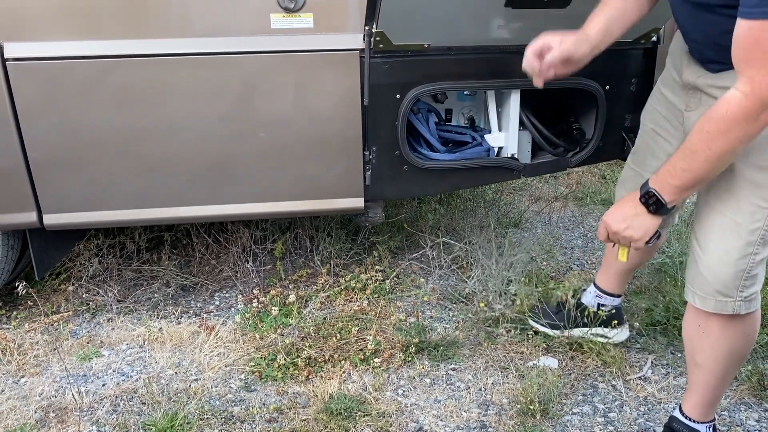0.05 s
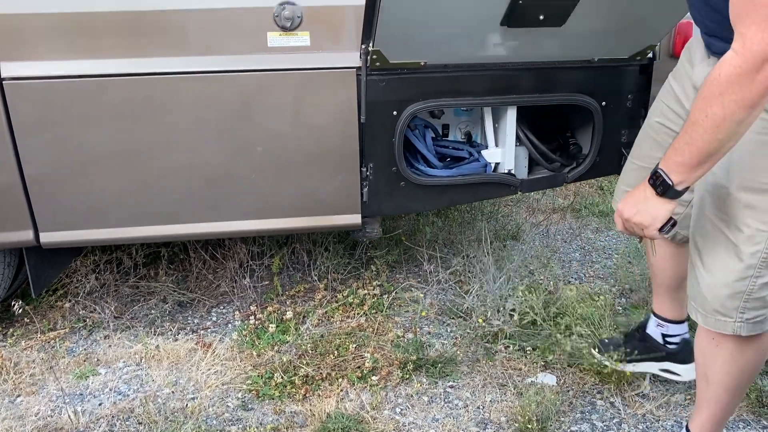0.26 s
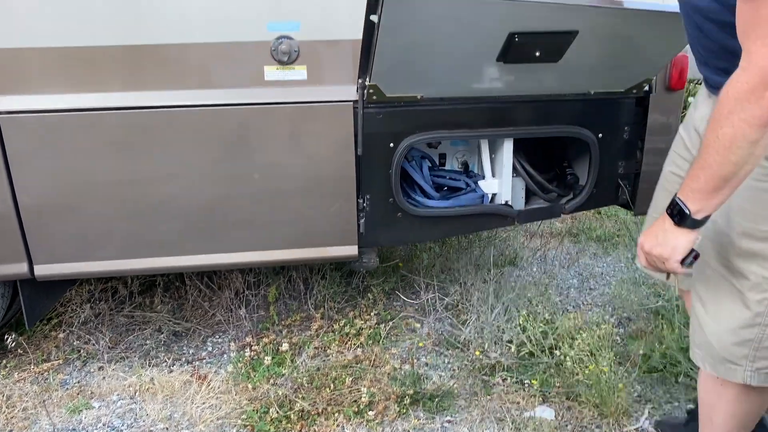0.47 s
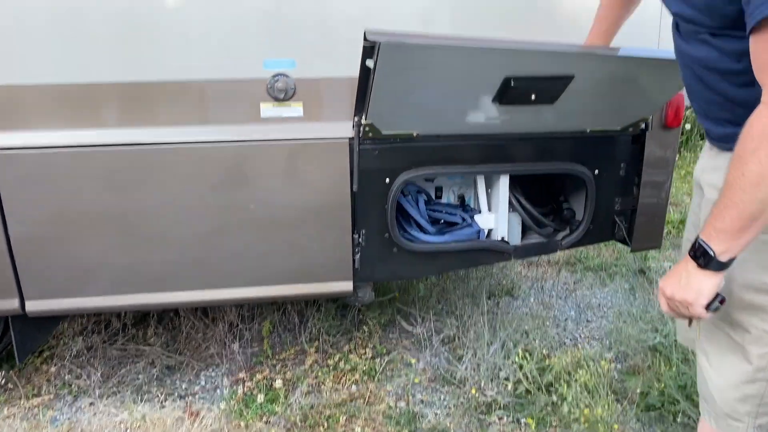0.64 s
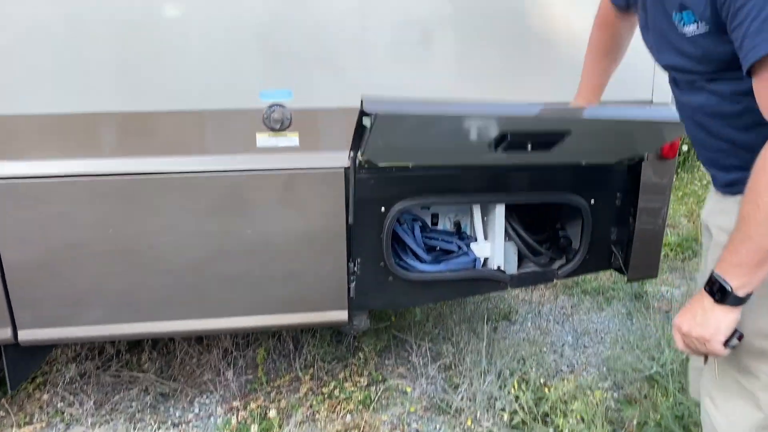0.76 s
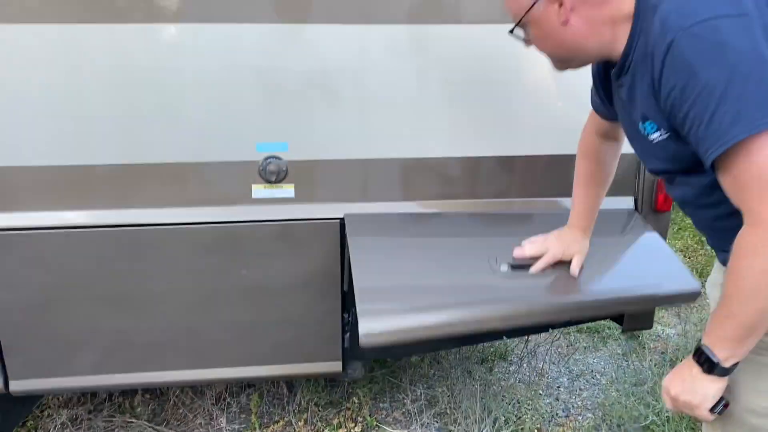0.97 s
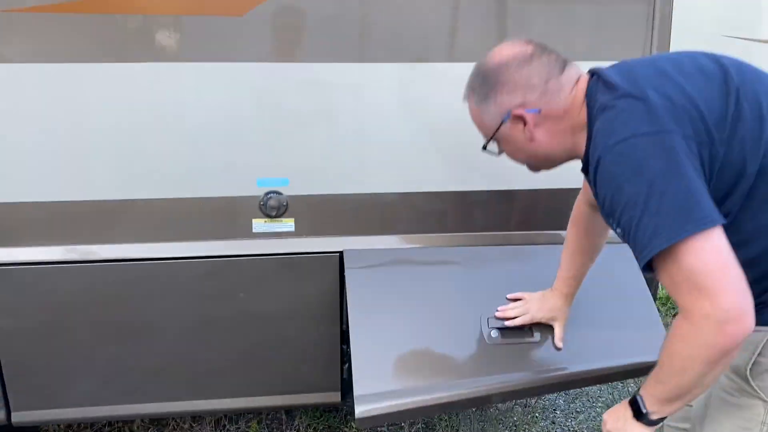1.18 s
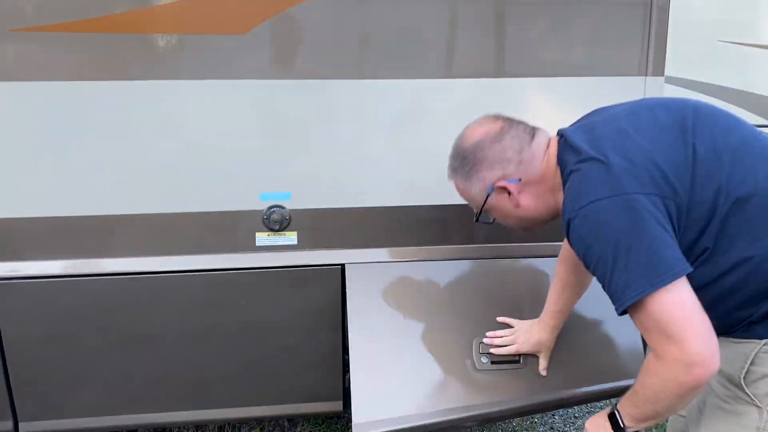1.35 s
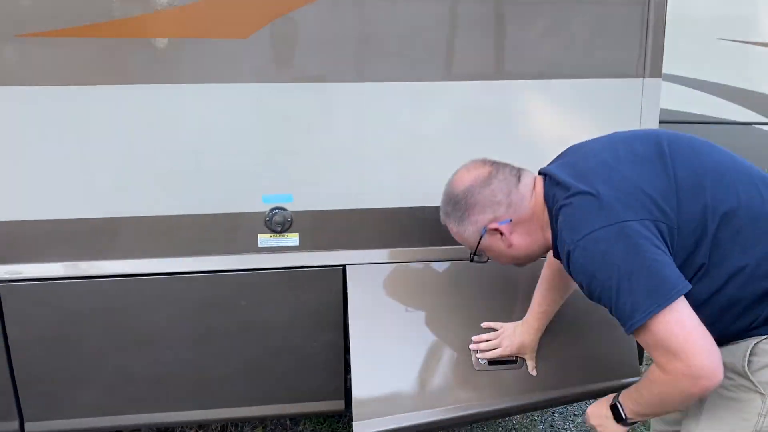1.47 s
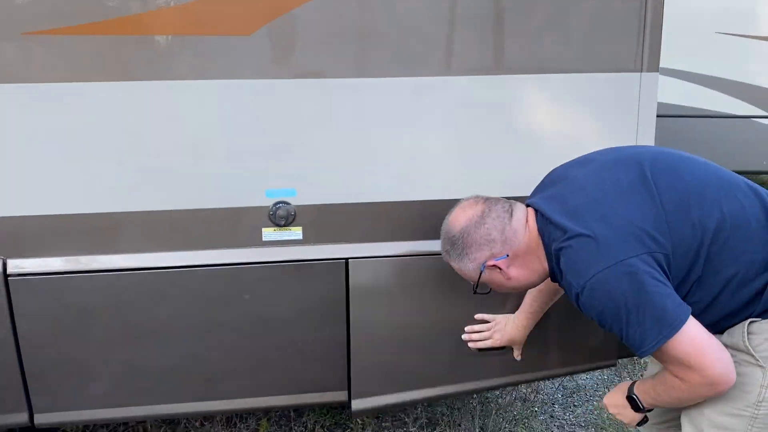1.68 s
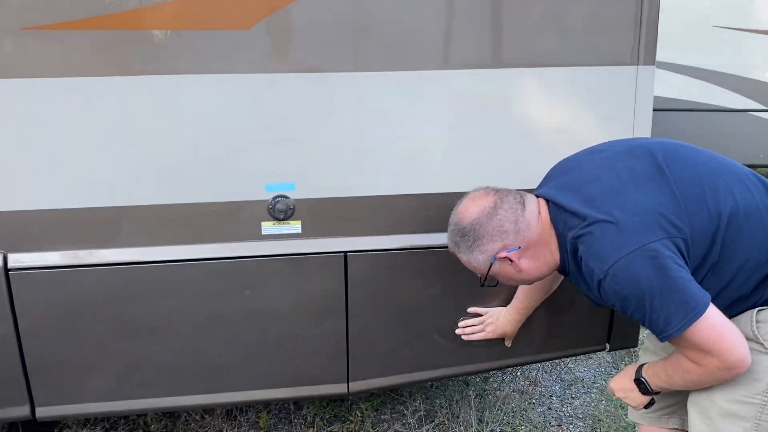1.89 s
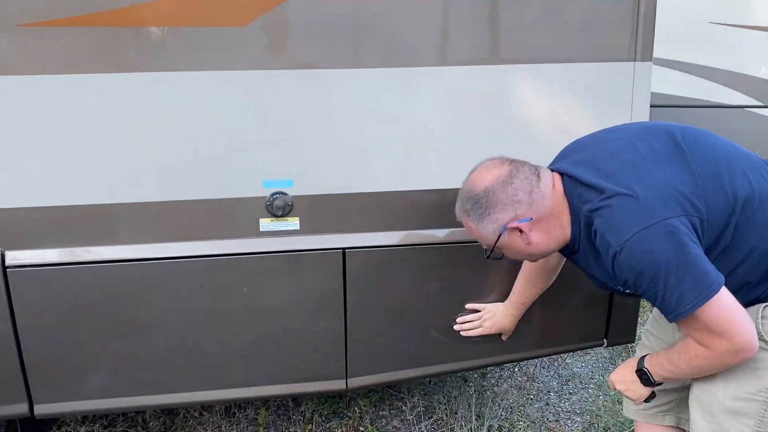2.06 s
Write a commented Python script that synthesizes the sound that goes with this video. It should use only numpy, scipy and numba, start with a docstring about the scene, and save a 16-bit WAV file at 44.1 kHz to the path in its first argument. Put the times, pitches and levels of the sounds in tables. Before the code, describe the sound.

Light clicks and knocks, then a metal compartment door bangs shut and rings briefly.

```python
"""A yard with gravel underfoot, about two metres from a motorhome whose metal side hatch is slammed.
Air rumbles, a distant machine hums and shoes scuff the stones. As the hatch swings down, light
impacts give knocks, ticks, taps and thuds. Then rim and latch strike the frame in quick succession:
each impulse sets the panel's modes in free, damped vibration, and the compartment booms at its
resonances. The yard returns a faint reverberant tail and one echo."""
import sys
import numpy as np
from scipy import signal
from scipy.fft import rfft, irfft, next_fast_len
from scipy.io import wavfile
from numba import njit

SR = 44100
rng = np.random.default_rng(int(sys.argv[2]) if len(sys.argv) > 2 else 0)


def generate_wav(sig):
    """Save sig (samples, or channels by samples) to the path in sys.argv[1] as 16-bit PCM at SR."""
    pcm = np.round(np.clip(np.atleast_2d(sig).T, -1, 1) * 32767).astype(np.int16)
    wavfile.write(sys.argv[1], SR, pcm)


N = 93580
T = np.arange(N) / SR
SEATING_S = 1.7435  # the hatch seats in its frame

# Spectrum of the outdoor air (f/Hz, level/dB)
AIR_SPECTRUM = [(20, -61), (40, 3.5), (58, -0.5), (120, -1), (170, -8), (350, -13.5), (700, -19.5),
                (1500, -25), (3000, -34), (6000, -40), (15000, -61)]
# Stereo width of the air, side relative to mid (f/Hz, level/dB)
AIR_WIDTH = [(60, -11), (110, -13), (200, -8.5), (380, -5), (700, 0), (1290, 3), (2380, -2.5), (4400, -3.5),
             (8120, 1), (15000, -5.5)]
# Partials of the distant machine (f/Hz, level/dB)
HUM_PARTIALS = [(76.4, -51), (100, -58.5)]
# Spectrum of the high hiss (f/Hz, level/dB)
HISS_SPECTRUM = [(5000, -1), (8000, -9.5), (10200, 4.5), (12000, -8.5), (13800, 8), (16000, -7.5)]
# Envelope of the hiss (t/s, relative level/dB)
HISS_ENVELOPE = [(0, -58.5), (.25, -57.5), (.45, -70), (1.2, -67.5), (1.4, -59.5), (1.62, -73.5),
                 (1.9, -74), (2.1, -93.5)]
# Spectrum of the yard's diffuse tail (f/Hz, level/dB)
TAIL_SPECTRUM = [(80, 15), (300, 0.5), (800, -8), (2000, -26), (5000, -30.5), (8000, -41.5), (15000, -60)]
# Frequency response of the echo path (f/Hz, level/dB)
ECHO_RESPONSE = [(100, -5), (800, -0.5), (2000, 1), (4800, 2.5), (9000, -5), (15000, -9)]
# Scuffs of the shoes (centre t/s, half length t/s, level/dB)
SHOE_SCUFFS = [(0.6, 0.022, -51), (0.736, 0.081, -53), (0.946, 0.088, -56), (1.301, 0.069, -58.5),
               (1.41, 0.032, -49), (1.493, 0.033, -55.5)]
# Spectrum of colliding stones (f/Hz, level/dB)
GRAVEL_SPECTRUM = [(200, 4), (800, 3), (2000, -4.5), (4300, -10.5), (8000, -21.5), (15000, -28.5)]
# Ticks of fittings and stones (t/s, level/dB, centre f/Hz)
TICK_IMPACTS = [(0.414, -52, 11000), (0.4877, -53.5, 6500), (0.713, -46, 7000), (.718, -52, 9500),
                (0.756, -49, 9000), (0.777, -50, 7000), (.857, -51.5, 5500), (1.068, -48.5, 9000),
                (1.292, -47, 3280), (1.336, -50.5, 3600), (1.358, -47, 13000), (1.362, -47, 3000),
                (1.493, -51.5, 4300), (1.648, -53.5, 4030), (1.6858, -42.5, 4430)]
# Thuds of the swinging hatch (t/s, level/dB, f/Hz)
FLEX_THUDS = [(0.671, -35, 319.4), (0.913, -38.5, 225), (.955, -70, 93)]
# Light taps on the sheet (t/s, level/dB)
SHEET_TAPS = [(0.4895, -37), (0.5586, -42.5)]
# Knocks of the hinge (t/s, level/dB, f/Hz)
HINGE_KNOCKS = [(0.593, -46, 954), (.609, -44, 834), (.6665, -32, 928), (.672, -34, 464.6),
                (.720, -46, 865), (.757, -42.5, 1003), (1.430, -49, 1157), (1.5405, -43, 723)]
# Spectrum of the hinge's rattle (f/Hz, level/dB)
RATTLE_SPECTRUM = [(150, 5), (320, 4), (650, -2.5), (1000, 0.5), (1900, -10), (4000, -28.5), (10000, -44)]
# Modes of the compartment and the vehicle's side (f/Hz, level/dB, T60/s)
COMPARTMENT_MODES = [(55.8, -9.5, 0.21), (59.9, -27.5, 2.2), (94.7, -15, 0.47), (113.8, -2.5, 0.15),
                     (142.7, -15, .3), (206.5, -16, 0.23), (470, -18, 0.12), (476, -38, 1.55)]
# Spectrum of the body's shudder around the frame (f/Hz, level/dB)
SHUDDER_SPECTRUM = [(25, -38.5), (45, -19), (65, -5.5), (130, -8.5), (220, -5), (330, -4), (450, -13),
                    (620, -5.5), (1000, -21), (4000, -50)]
# Contacts of the slam (t/s, panel level/dB, latch level/dB)
SLAM_CONTACTS = [(1.7293, -26.5, -49), (1.7335, -7.5, -28.5), (1.7378, -8.5, -13.5), (1.7406, -15, -10.5),
                 (1.7457, -8.5, -27.5), (1.7570, -20, -26), (1.7636, -18, -33.5), (1.7765, -19, -23.5)]
# Modes of the hatch panel (f/Hz, relative level/dB, T60/s)
HATCH_MODES = [(301.5, -6.5, 0.14), (338.3, -11, 0.18), (366, -9, 0.24), (507, -10, .13), (605.6, -2, .13),
               (677, -5.5, 0.12), (735, -3, 0.086), (785, 0, 0.053), (852, 2, 0.087), (990, -8, 0.095),
               (1290, -28, 0.097), (1427, -12, 0.116), (1656, -11.5, 0.078), (2720, -26, 0.069),
               (3806, -17.5, 0.11)]
# Spectrum of the metal skin's clatter (f/Hz, level/dB)
SKIN_SPECTRUM = [(120, -31.5), (300, -3.5), (500, -7.5), (800, 6.5), (1150, -6.5), (1550, -5.5),
                 (2400, -16), (5000, -17), (10000, -38)]
# Spectrum of the latch's crack (f/Hz, level/dB)
LATCH_SPECTRUM = [(800, -20), (2000, 1), (3500, 0), (5800, 2.5), (8000, -10.5), (10500, -6), (12000, -24),
                  (13700, 3), (16000, -33.5)]
# Stereo width of the hatch, side relative to mid (f/Hz, level/dB)
HATCH_WIDTH = [(60, -20), (250, -17), (600, -7), (2000, -6.5), (5000, -1.5), (9000, 0)]
# Balance of the near sources, left relative to right (f/Hz, level/dB)
NEAR_BALANCE = [(60, -0.5), (130, -2), (260, .5), (520, -1), (1000, -3), (4000, -3), (9000, -1.5)]


def undb(db):
    """Amplitude ratio of a level in decibels."""
    return 10 ** (np.asarray(db) / 20)


def colour(x, points):
    """Linear filtering: the spectrum is multiplied by a curve of (f/Hz, level/dB) points."""
    hz, db = np.array(points, float).T
    size = next_fast_len(N + 4096, real=True)
    f = np.maximum(np.fft.rfftfreq(size, 1 / SR), 1)
    response = undb(np.interp(np.log(f), np.log(hz), db))
    return irfft(rfft(x, size) * response, size)[..., :N]


def unit(x):
    """Normalisation to rms 1."""
    return x / np.std(x)


def noise(spectrum, width):
    """Partly coherent stereo noise of rms 1: the sum and difference of mid and side signals."""
    mid, side = rng.standard_normal((2, N))
    return unit(colour(mid + np.array([[1], [-1]]) * colour(side, width), spectrum))


def fade(start, t60, rise=0.00049):
    """Exponential damping: after a quick rise the level falls 60 dB in t60 seconds."""
    age = np.maximum(T - start, 0)
    return (1 - np.exp(-age / rise)) * np.exp(-np.log(1000) * age / t60)


def ring(start, hz, t60, rise=0.00021):
    """Free vibration of one struck mode: a damped sinusoid."""
    return fade(start, t60, rise) * np.sin(2 * np.pi * hz * (T - start))


def metal_noise(spectrum, spacing_hz, scatter_db):
    """High modal density: one noise per slam contact, all through the same uneven resonances."""
    noises = np.array([noise(spectrum, HATCH_WIDTH) for _ in SLAM_CONTACTS])
    hz = np.arange(1, SR / 2, spacing_hz)
    db = scatter_db * rng.standard_normal(N)[:len(hz)]
    return unit(colour(noises, np.column_stack([hz, db])))


def machine_hum():
    """Steady vibration of a distant machine radiates a line spectrum."""
    return sum(undb(db) * np.sqrt(2) * np.sin(2 * np.pi * (hz * T + rng.random()))
               for hz, db in HUM_PARTIALS)


def air():
    """Random pressure has a continuous spectrum: a low rumble, and a hiss that comes and goes."""
    hiss_db = np.interp(T, *np.array(HISS_ENVELOPE).T) - 2
    hiss = undb(hiss_db) * noise(HISS_SPECTRUM, AIR_WIDTH)
    return hiss + undb(-50) * noise(AIR_SPECTRUM, AIR_WIDTH)


def yard_reflections(bang):
    """Diffuse reflection gives a faint tail; scattering across the yard smears one late echo."""
    tail = undb(-25.5) * noise(TAIL_SPECTRUM, AIR_WIDTH) * fade(SEATING_S, t60=0.82, rise=0.014)
    echo_path = rng.standard_normal((2, N)) * fade(start=0.142, t60=0.31)
    echo_path /= np.sqrt(np.sum(echo_path ** 2, axis=1, keepdims=True))  # unit energy
    echo = signal.fftconvolve(colour(bang, ECHO_RESPONSE), echo_path, axes=1)[:, :N]
    return tail + undb(-36.5) * echo


def gravel(grains_per_s=6800, scatter_db=7, width=0.8):
    """Shot noise: stones collide at random under the shoes, swelling with each scuff."""
    impacts = (rng.random(N) < grains_per_s / SR) * undb(scatter_db * rng.uniform(-0.69, 1, N))
    grains = impacts * (rng.standard_normal(N) + width * rng.standard_normal((2, N)))
    swell = sum(undb(db) * np.exp(-((T - centre) / half) ** 2) for centre, half, db in SHOE_SCUFFS)
    return unit(colour(grains, GRAVEL_SPECTRUM)) * swell


def squeak(centre_s=1.574, half_s=0.022, centre_hz=5600, fall_hz_per_s=23000):
    """A linear chirp under a Gaussian envelope is heard as a faint, falling squeak."""
    offset = T - centre_s
    cycles = centre_hz * offset - fall_hz_per_s * offset ** 2 / 2
    return undb(-70.5) * np.exp(-(offset / half_s) ** 2) * np.sin(2 * np.pi * cycles)


def ticks(db_per_octave=6.5):
    """Brief impacts have broad spectra: fittings and stones tick, each with its own brightness."""
    out = 0
    for start, db, hz in TICK_IMPACTS:
        hump = [(hz * 2. ** octave, -db_per_octave * abs(octave)) for octave in range(-5, 4)]
        out += undb(db) * noise(hump, HATCH_WIDTH) * fade(start, t60=0.018)
    return out


def flex_thuds():
    """Flexural vibration: the swinging hatch bends under the hand and sounds its low modes."""
    return sum(undb(db) * ring(start, hz, t60=0.098, rise=0.0013) for start, db, hz in FLEX_THUDS)


def sheet_taps(from_hz=1220, to_hz=358, fall_s=0.00237):
    """Dispersion: the treble of a bending wave arrives first, so each tap drops quickly in pitch."""
    out = 0
    for start, db in SHEET_TAPS:
        age = np.maximum(T - start, 0)
        cycles = to_hz * age + (from_hz - to_hz) * fall_s * (1 - np.exp(-age / fall_s))
        out += undb(db) * fade(start, t60=0.076) * np.sin(2 * np.pi * cycles)
    return out


def hinge_knocks():
    """Impact excitation: each knock of the hinge rings one hollow mode and a short rattle."""
    rattle = undb(-4.5) * noise(RATTLE_SPECTRUM, HATCH_WIDTH)
    return sum(undb(db) * (ring(start, hz, t60=0.06) + rattle * fade(start, t60=0.11))
               for start, db, hz in HINGE_KNOCKS)


def compartment_boom(rise_s=0.0034):
    """Resonance: as the hatch seats, cavity and side wall ring in low modes and the body shudders."""
    shudder = noise(SHUDDER_SPECTRUM, HATCH_WIDTH) * fade(SEATING_S, t60=0.21, rise=rise_s)
    modes = sum(undb(db) * ring(SEATING_S, hz, t60, rise_s) for hz, db, t60 in COMPARTMENT_MODES)
    return modes + undb(-13.5) * shudder


def hatch_slam(brush_s=0.0045):
    """Modal superposition: the seal brushes the frame, then rim and latch strike and ring the panel."""
    first_contact = SLAM_CONTACTS[0][0]
    seal_brush = np.exp(-np.abs(T - first_contact) / brush_s)
    out = undb(-33.5) * noise(SKIN_SPECTRUM, HATCH_WIDTH) * seal_brush
    skins = metal_noise(SKIN_SPECTRUM, spacing_hz=25.1, scatter_db=1.5)
    latches = metal_noise(LATCH_SPECTRUM, spacing_hz=118.1, scatter_db=2.5)
    for (start, panel_db, latch_db), skin, latch in zip(SLAM_CONTACTS, skins, latches):
        modes = sum(undb(db) * ring(start, hz, t60, rise=1 / hz) for hz, db, t60 in HATCH_MODES)
        clatter = skin * fade(start, t60=0.1)
        panel = undb(-6) * modes + undb(-1) * clatter
        crack = latch * (fade(start, t60=0.024) + undb(-10.5) * fade(start, t60=0.097))
        out += undb(panel_db) * panel + undb(latch_db) * crack
    return out


def scene():
    """Sound pressures add; a level difference places hatch and shoes a little to the right."""
    bang = hatch_slam() + compartment_boom()
    near = bang + hinge_knocks() + ticks() + sheet_taps() + squeak() + flex_thuds() + gravel()
    placed = np.array([colour(channel, [(hz, sign * db / 2) for hz, db in NEAR_BALANCE])
                       for channel, sign in zip(near, (1, -1))])
    return placed + yard_reflections(bang) + machine_hum() + air()


@njit
def follow(x, attack_s, release_s):
    """Envelope detection: a first-order lag with separate time constants for rise and fall."""
    out, level = np.empty(len(x)), 0.
    for i in range(len(x)):
        lag_s = attack_s if x[i] > level else release_s
        level += (x[i] - level) / (lag_s * SR)
        out[i] = level
    return out


def record(dry, low_cut_hz=27.4, top_hz=15800, threshold=0.43, ratio=2.5):
    """Band limiting and compression: the gain ducks after the bang and saturation rounds the peaks."""
    low_cut = signal.butter(3, low_cut_hz, "high", fs=SR, output="sos")
    top_cut = signal.ellip(8, 0.2, 70, top_hz, fs=SR, output="sos")
    x = signal.sosfilt(low_cut, dry)
    level = follow(np.abs(x).max(axis=0), attack_s=0.004, release_s=0.7)
    gain = np.maximum(level / threshold, 1) ** (1 / ratio - 1)
    return signal.sosfilt(top_cut, np.tanh(x * gain))


dry = scene()
out = record(dry)
generate_wav(out)
```